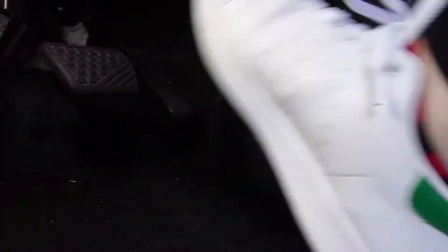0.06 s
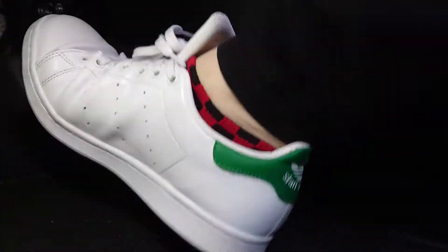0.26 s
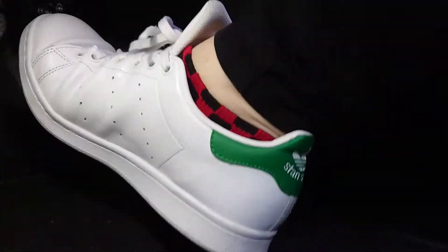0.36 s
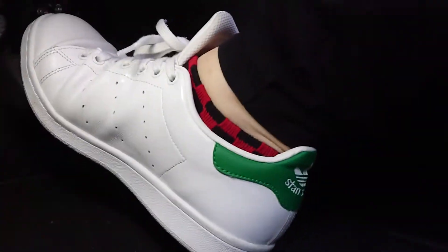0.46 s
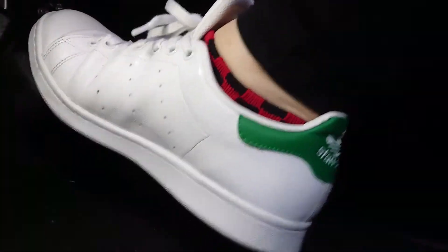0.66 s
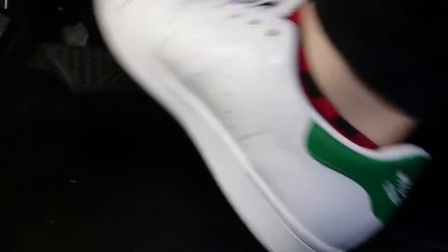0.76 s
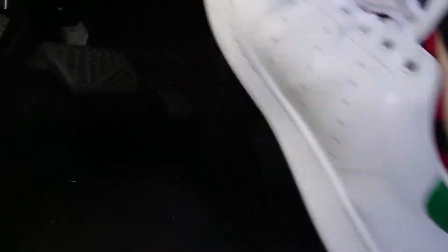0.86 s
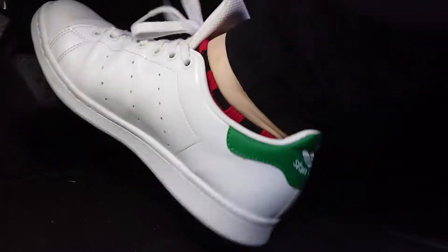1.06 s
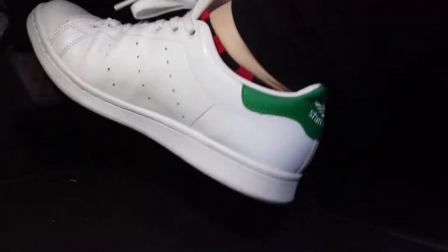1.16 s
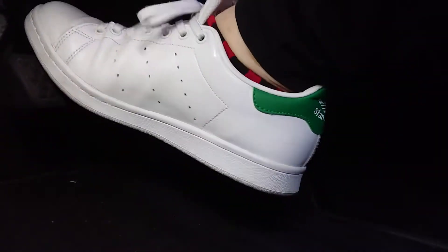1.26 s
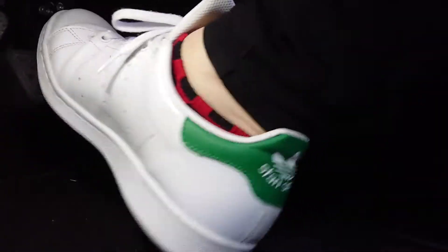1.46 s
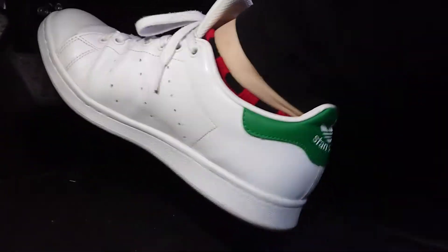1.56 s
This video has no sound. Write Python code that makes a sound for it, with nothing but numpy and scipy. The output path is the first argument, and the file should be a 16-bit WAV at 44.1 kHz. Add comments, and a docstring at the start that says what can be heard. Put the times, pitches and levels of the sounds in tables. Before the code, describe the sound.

A car pedal hits its stop with a sharp metal clack and a low boom. A shoe sole scuffs on the rubber pad, then the pedal clacks again. Heard close up in the footwell over a steady low rumble.

```python
"""A car footwell, close up: a shoe works a pedal over the cabin's low, steady rumble. Twice the pedal
hits its stop with a double clack of steel that sets the floor booming and leaves a short fizz.
In between, the sole sticks and slips on the ribbed rubber pad, scuffing and squeaking.
Cloth swishes faintly as the leg moves, and shoe and pedal give a few small ticks."""
import sys
import numpy as np
from scipy import signal
from scipy.fft import rfft, irfft, next_fast_len
from scipy.io import wavfile
from scipy.ndimage import map_coordinates

SR = 44100
rng = np.random.default_rng(int(sys.argv[2]) if len(sys.argv) > 2 else 0)


def inscribe(sig):
    """Save sig as 16-bit PCM at rate SR to the path in sys.argv[1].

    A 1-D sig is mono; a 2-D sig holds one channel per row.
    Samples are clipped to [-1, 1] before scaling.
    """
    pcm = np.round(np.clip(np.atleast_2d(sig).T, -1, 1) * 32767)
    wavfile.write(sys.argv[1], SR, pcm.astype(np.int16))


N = 70560


def amp(db):
    """Decibels to gain."""
    return 10 ** (np.asarray(db) / 20)


def unit(x):
    """Scaled to rms 1."""
    return x / np.sqrt(np.mean(x ** 2) + 1e-20)


def along(points, hz):
    """Reads a curve of (freq_hz, value) points on a log frequency axis."""
    freqs, values = np.transpose(points)
    return np.interp(np.log(hz + 1), np.log(freqs + 1), values)


def since(start_s):
    """Seconds after a moment, zero before it."""
    return np.maximum(np.arange(N) / SR - start_s, 0)


def fader(rows):
    """Gain per sample from (time_s, level_db) rows, silent outside them."""
    return amp(np.interp(since(0), *np.transpose(rows), left=-np.inf, right=-np.inf))


def wobble(rate_hz):
    """A smooth random curve with rate_hz knots a second."""
    return map_coordinates(rng.standard_normal(N // 8), [since(0) * rate_hz], mode="wrap")


def filtered(x, response):
    """Shapes x with a gain given as a function of frequency."""
    size = next_fast_len(N + SR // 2)
    return irfft(rfft(x, size) * response(np.fft.rfftfreq(size, 1 / SR)), size)[..., :N]


def strike(start_s, t60_s, rise_s):
    """Envelope of a blow: a quick attack and an exponential decay."""
    t = since(start_s)
    return (1 - np.exp(-t / rise_s)) * np.exp(-np.log(1000) * t / t60_s)


def ring(start_s, modes, rise_s, scatter_db=0):
    """Struck, damped modes; scatter_db varies their balance from hit to hit."""
    out = 0
    for hz, db, t60_s in modes:
        gain = amp(db + scatter_db * rng.standard_normal())
        out += gain * strike(start_s, t60_s, rise_s) * np.sin(2 * np.pi * hz * since(start_s))
    return out


# How alike left and right are in every noise: freq_hz, correlation
STEREO_LIKENESS = [(60, 0.96), (300, 0.96), (700, 0.28), (3000, 0.38), (8000, 0.28), (14000, 0.17)]

def noise(colour, grain_db=0):
    """Stereo noise of rms 1, roughened by grain_db before it is coloured."""
    def mid_side_eq(hz):
        spread = np.arccos(np.clip(along(STEREO_LIKENESS, hz), -1, 1)) / 2
        return amp(along(colour, hz)) * [np.cos(spread), np.sin(spread)]

    source = rng.standard_normal((2, N)) * amp(grain_db * wobble(900))
    mid, side = filtered(source, mid_side_eq)
    return unit(np.array([mid + side, mid - side]))


# Deep room tone of the cabin: freq_hz, gain_db
RUMBLE_EQ = [(20, -21.5), (40, -6), (63, -3.5), (85, -10.5), (125, -9), (170, -23), (240, -24.5),
             (330, -25), (550, -31.5), (1000, -44), (2000, -54), (4500, -56.5), (7500, -80), (10000, -66.5),
             (12000, -58.5), (16000, -77)]

def cabin(rumble_db=-41.5, hum_hz=62.86, hum_db=-43):
    """The bed: a steady low rumble with a wavering hum."""
    hum = np.sin(2 * np.pi * hum_hz * since(0) + wobble(9)) * amp(2 * wobble(12))
    return amp(rumble_db) * noise(RUMBLE_EQ) + amp(hum_db) * unit(hum)


# Moves of the leg: peak_s, level_db, half_length_s
SWISHES = [(-0.005, -65.5, 0.033), (0.803, -66, 0.034), (1.49, -63, 0.025)]
# Airy hiss of cloth: freq_hz, gain_db
SWISH_EQ = [(1000, -4), (3000, -6), (5000, 0), (7500, -28), (11000, -13.5), (16000, -34)]

def cloth_swishes():
    """Cloth brushes in soft swells as the leg moves."""
    swells = sum(amp(db) * np.exp(-((since(0) - peak_s) / half_s) ** 2 / 2)
                 for peak_s, db, half_s in SWISHES)
    return swells * noise(SWISH_EQ)


# Hard metal contacts, three to each stop: start_s, level_db
CLACKS = [(0.2101, -15.5), (0.2123, -20.5), (0.2169, -23.5), (1.0878, -23.5), (1.0903, -26), (1.0988, -31)]
# Crack of a contact: freq_hz, gain_db
CLACK_EQ = [(200, -24.5), (700, -3), (1400, -4), (2500, 0), (4100, 6), (5200, -6.5), (6500, -18.5),
            (7600, -49), (10500, -17.5), (16000, -33.5)]
# Ring of the pedal's steel: pitch_hz, level_db, t60_s
STEEL_MODES = [(759, -5, 0.19), (1265, -12, 0.094), (1846, -2, 0.1), (2465, 0.5, 0.068),
               (3400, -20.5, 0.0706), (3480, -15, 0.18), (3830, -1.5, .07), (4015, 3, 0.052),
               (4280, -14, 0.064), (3850, -9, .07), (4364, -1.5, 0.045), (5800, -20.5, .06)]

def pedal_clacks(steel_db=-13.5):
    """The pedal hits its stop: each contact is a dry crack with a ring of steel."""
    out = np.zeros((2, N))
    for start_s, db in CLACKS:
        steel = np.array([ring(start_s, STEEL_MODES, rise_s=.0002, scatter_db=2)
                          for side in ("left", "right")])
        crack = noise(CLACK_EQ) * strike(start_s, t60_s=.017, rise_s=.0001)
        out += amp(db) * (crack + amp(steel_db) * steel)
    return out


# Dull knocks of the pedal arm: start_s, thump_db, tilt_db_per_octave, clatter_db
KNOCKS = [(0.211, -14, -3.5, -22.5), (1.0890, -22.5, 10.5, -25.5), (1.0965, -17.5, 4.5, -27)]
# Body of the arm and its bracket: pitch_hz, level_db, t60_s
ARM_MODES = [(135, -2, .14), (200, -4, .1), (245, -4, .07), (311, 1, .11), (405, -10, .06), (462, -10, .06),
             (628, -17, .085), (765, -18, .06)]
# Dull clatter: freq_hz, gain_db
CLATTER_EQ = [(40, -31), (110, -11), (200, 8), (320, 0), (500, -5), (800, -7), (1400, -15), (3000, -25.5),
              (8000, -66)]

def arm_knocks(pivot_hz=311):
    """Arm and bracket thump and clatter, putting weight under the clack."""
    out = np.zeros((2, N))
    for start_s, thump_db, tilt, clatter_db in KNOCKS:
        modes = [(hz, db + tilt * np.log2(hz / pivot_hz), t60_s) for hz, db, t60_s in ARM_MODES]
        out += amp(thump_db) * ring(start_s, modes, rise_s=.001, scatter_db=.5)
        out += amp(clatter_db) * noise(CLATTER_EQ) * strike(start_s, t60_s=.16, rise_s=.0006)
    return out


# The pedal reaches its stop: start_s, boom_db, fizz_db, fizz_hold_s, fizz_fall_db_per_s
STOPS = [(0.2091, -11.5, -38.5, 0.1, 544), (1.0858, -11, -38, 0.088, 416.5)]
# Boom of floor panel and cabin air: pitch_hz, level_db, t60_s
FLOOR_MODES = [(50, -7, .55), (64.6, 0, .55), (119, -3, .38), (141, -17, .4), (168, -14, .25),
               (275, -31, .4), (320, -31, .4)]

def floor_boom(delay_s=.0058, hold_s=.105, drop_db=3):
    """The floor booms just after each stop and is then damped."""
    out = np.zeros(N)
    for start_s, boom_db, *_ in STOPS:
        damping = np.clip((since(start_s) - hold_s) / .015, 0, 1)
        boom = ring(start_s + delay_s, FLOOR_MODES, rise_s=.004, scatter_db=3.5)
        out += amp(boom_db - drop_db * damping) * boom
    return out


# Bright, peaky fizz: freq_hz, gain_db
FIZZ_EQ = [(300, 3), (1000, -6), (2000, -13.5), (2600, -3), (3000, 4.5), (3500, -4), (3950, 2.5),
           (4500, -1), (6300, -4.5), (7000, -12), (7800, -22.5), (9200, -15.5), (10100, 1), (10900, -7.5),
           (13000, -15), (16000, -18)]

def fizz(sag_db_per_s=38.5, buzz_db=-9.5, width_hz=16):
    """While the floor shakes, a fine rattle hangs on and keeps the pedal's steel buzzing."""
    def steel_resonances(f):
        loss = 1j * f * width_hz
        return sum((-1) ** k * amp(db) * loss / (hz * hz - f * f + loss)
                   for k, (hz, db, _) in enumerate(STEEL_MODES))

    out = np.zeros((2, N))
    for start_s, _, fizz_db, hold_s, fall_db_per_s in STOPS:
        t = since(start_s)
        attack = 1 - np.exp(-t / .005)
        fade_db = sag_db_per_s * t + fall_db_per_s * since(start_s + hold_s)
        rattle = noise(FIZZ_EQ, grain_db=-.5)
        buzz = unit(filtered(noise(FIZZ_EQ), steel_resonances))
        out += amp(fizz_db - fade_db) * attack * unit(rattle + amp(buzz_db) * buzz)
    return out


# Thin tones of the return spring: pitch_hz, level_db, t60_s
SPRING_MODES = [(1900, -54, .7), (2950, -60, .55)]

def return_spring():
    """The spring sings on faintly after each stop."""
    return sum(ring(start_s, SPRING_MODES, rise_s=.003) for start_s, *_ in STOPS)


# Contacts of the linkage: start_s, level_db
SNAPS = [(0.217, -21), (1.0956, -19)]
# Crisp edge of a snap: freq_hz, gain_db
SNAP_EQ = [(300, -25.5), (1200, -5), (2500, -1), (4200, -5), (6200, -2.5), (7600, -24), (9000, -10.5),
           (10400, 0), (12500, -11), (16000, -22)]

def linkage_snaps():
    """The linkage snaps after the arm: the second, brighter half of the double clack."""
    return sum(amp(db) * noise(SNAP_EQ, grain_db=-1) * strike(start_s, t60_s=.033, rise_s=.0004)
               for start_s, db in SNAPS)


# Fader ride of the sole's grit: time_s, level_db
GRIT_FADER = [(.78, -83), (.805, -60.5), (.82, -44), (.845, -54.5), (.885, -54.5), (.9, -50.5),
              (.92, -60.5), (.96, -73), (1.0, -63), (1.06, -65.5)]
# Sandy top of the scuff: freq_hz, gain_db
GRIT_EQ = [(300, 0), (900, 8.5), (2000, -2.5), (3500, -3), (6000, -7), (7700, -33), (10500, -6.5),
           (16000, -26)]

def sole_grit(flicker_db=3.9):
    """The sole grinds over the pad with a grainy, flickering scrape."""
    grit = noise(GRIT_EQ, grain_db=1.5) * amp(flicker_db * wobble(130))
    return fader(GRIT_FADER) * unit(grit)


# Fader ride of the low scuff, for both rub and judder: time_s, level_db
SCUFF_FADER = [(.8, -72), (0.812, -65), (0.818, -23), (0.843, -22), (.87, -27.5), (0.901, -29.5),
               (.95, -33.5), (1.0, -39), (1.058, -45.5), (1.08, -92)]
# Low body of the rub: freq_hz, gain_db
RUB_EQ = [(30, -8.5), (70, -1), (105, 9), (160, 0.5), (240, -10.5), (360, -6.5), (550, -22), (900, -27.5),
          (1600, -37), (5000, -69)]

def sole_rub(trim_db=-2):
    """The sole slides on the rubber with a low, dull rub."""
    return amp(trim_db) * fader(SCUFF_FADER) * noise(RUB_EQ, grain_db=4)


# Ring of pad and pedal under the sole: pitch_hz, level_db, t60_s
PAD_MODES = [(101.4, -6, 0.19), (143.5, -4.5, 0.12), (252, -8.5, 0.084), (343, -3, 0.045),
             (457, -13.5, 0.066), (755, -32, 0.0098)]

def sole_judder(slips_per_s=105, unevenness=.202, dulling_db_per_octave_s=30.5, trim_db=-2.5):
    """The sole sticks and slips at an uneven rate; each slip rings the pad, duller as the foot slows."""
    start_s, end_s = SCUFF_FADER[0][0], SCUFF_FADER[-1][0]
    gap_jitter, force_jitter = rng.standard_normal((60, 2)).T
    times = start_s + np.cumsum(np.exp(unevenness * gap_jitter)) / slips_per_s
    forces = amp(2 * force_jitter) * (times < end_s)
    slips = np.bincount((times * SR).astype(int), forces, minlength=N)[:N] * fader(SCUFF_FADER)
    out = np.zeros(N)
    for hz, db, t60_s in PAD_MODES:
        dulling_db = dulling_db_per_octave_s * since(start_s) * np.log2(hz / PAD_MODES[0][0])
        pad = ring(0, [(hz, db, t60_s)], rise_s=.0006)
        out += signal.fftconvolve(slips * amp(-dulling_db), pad)[:N]
    return amp(trim_db) * out


# Small ticks of shoe and pedal: start_s, level_db, centre_hz, width_octaves, t60_s
TICKS = [(0.815, -44, 11700, 0.24, 0.039), (0.8171, -34, 380, 0.43, 0.041), (0.8946, -43, 2270, 0.68, .04),
         (0.932, -54, 2880, 0.7, 0.047), (.9765, -40, 600, 1.16, 0.017), (1.2279, -32, 1450, 0.13, 0.0093),
         (1.2277, -42, 3480, 1.9, 0.011), (1.4053, -46.5, 1910, 0.79, 0.016)]

def ticks():
    """Each tick is a short burst of noise in one resonance."""
    out = np.zeros((2, N))
    freqs = np.geomspace(20, SR / 2, num=200)
    for start_s, db, centre_hz, width_octaves, t60_s in TICKS:
        offset = np.log2(freqs / centre_hz) / width_octaves
        bell_db = -20 * np.log10(1 + offset ** 2 / 2 + offset ** 4 / 2)
        burst = noise(np.column_stack([freqs, bell_db]))
        out += amp(db) * burst * strike(start_s, t60_s, rise_s=.00017)
    return out


# Brief rubs of the shoe: peak_s, level_db, half_length_s
SQUEAKS = [(1.0188, -34, 0.0059)]
# Thin, high squeak: freq_hz, gain_db
SQUEAK_EQ = [(800, -35.5), (2500, -18), (4200, -7), (6000, -14.5), (7400, -23.5), (9000, -11.5),
             (10400, 2.5), (12000, -7.5), (14000, -8), (16000, -9.5)]

def sole_squeak():
    """A quick rub on the rubber gives a sharp swell of high, grainy noise."""
    out = np.zeros((2, N))
    for peak_s, db, half_s in SQUEAKS:
        swell = (1 + ((since(0) - peak_s) / half_s) ** 2) ** -1.9
        out += amp(db) * swell * noise(SQUEAK_EQ, grain_db=1.5)
    return out


# Leftward pan of pedal and shoe: freq_hz, left_minus_right_db
PAN = [(40, 3), (130, 0.5), (290, 1), (640, -1), (1300, 2.5), (2400, 7), (4200, 0.5), (8000, 4),
       (15000, 12.5)]

def scene(left_lead_s=.00022, cabin_left_db=1.73):
    """Pedal and shoe lie to the left and reach that side first; the rumble is all around."""
    sides = np.array([[.5], [-.5]])

    def place_left(hz):
        return amp(sides * along(PAN, hz)) * np.exp(2j * np.pi * hz * sides * left_lead_s)

    hits = pedal_clacks() + arm_knocks() + floor_boom() + fizz() + return_spring() + linkage_snaps()
    moves = cloth_swishes() + sole_grit() + sole_rub() + sole_judder() + ticks() + sole_squeak()
    return filtered(hits + moves, place_left) + cabin() * amp(sides * cabin_left_db)


def record(dry, low_cut_hz=37, top_hz=16200):
    """Rolls off the deepest bass and cuts the very top steeply."""
    low_cut = signal.butter(N=2, Wn=low_cut_hz, btype="high", fs=SR, output="sos")
    return filtered(signal.sosfilt(low_cut, dry), lambda hz: 1 / np.sqrt(1 + (hz / top_hz) ** 160))


dry = scene()
out = record(dry)
inscribe(out)
```